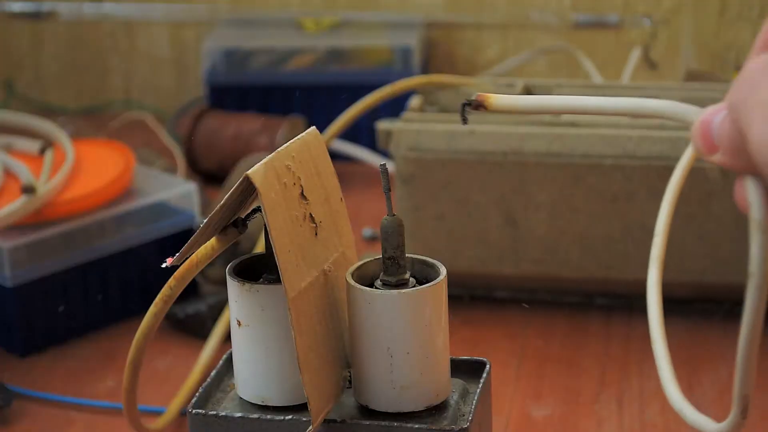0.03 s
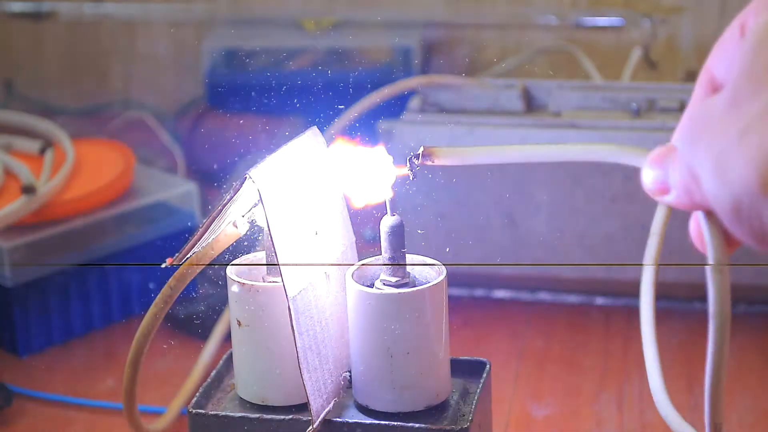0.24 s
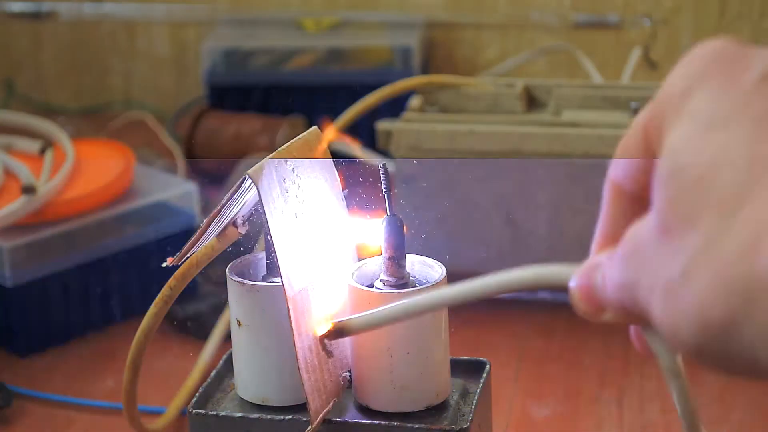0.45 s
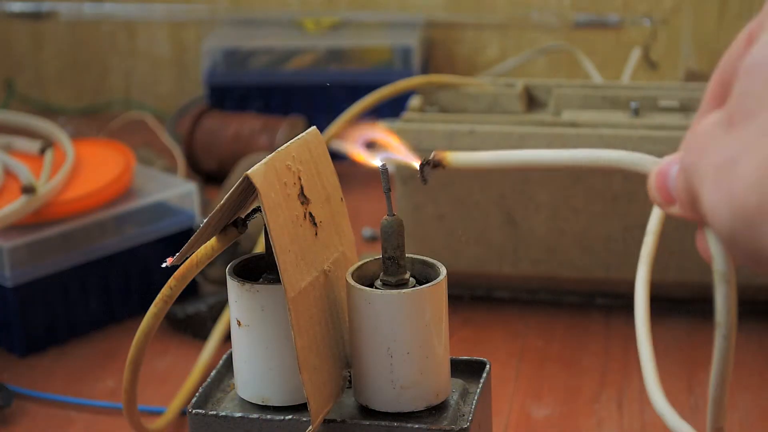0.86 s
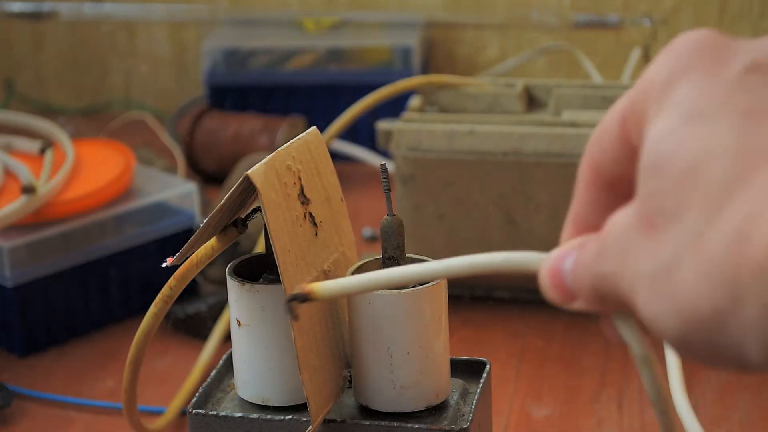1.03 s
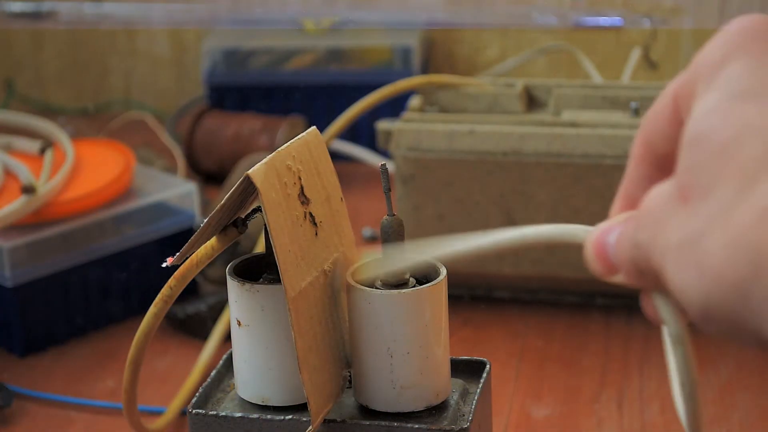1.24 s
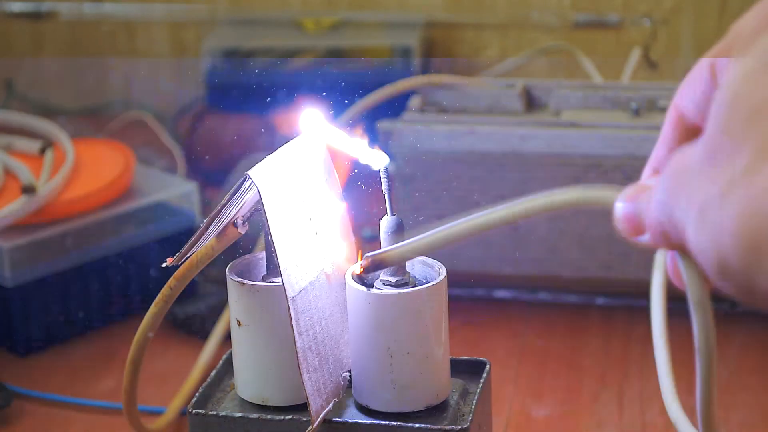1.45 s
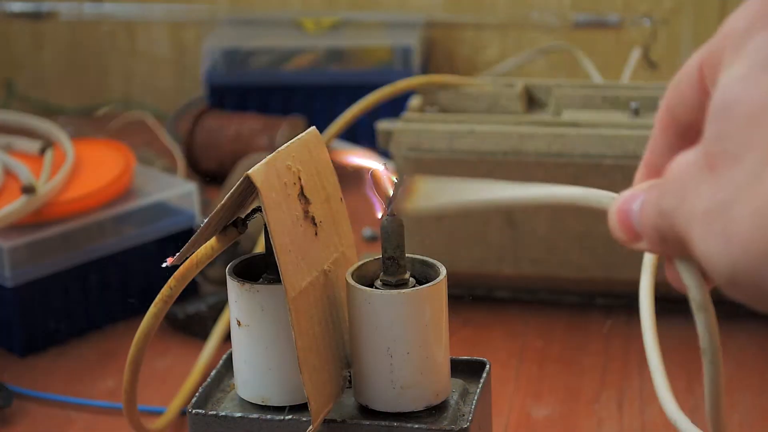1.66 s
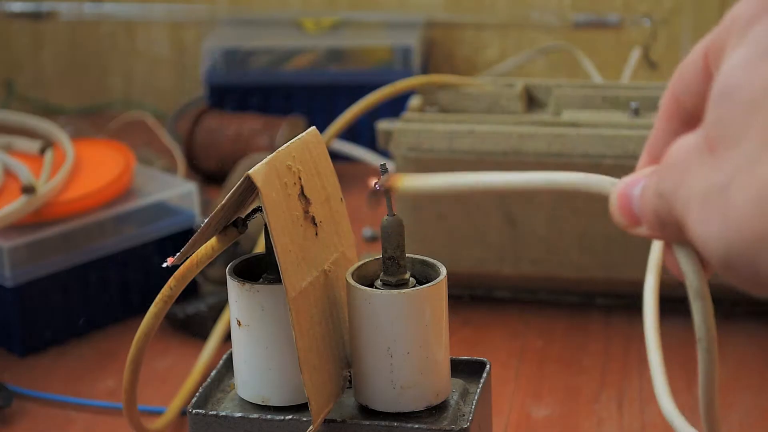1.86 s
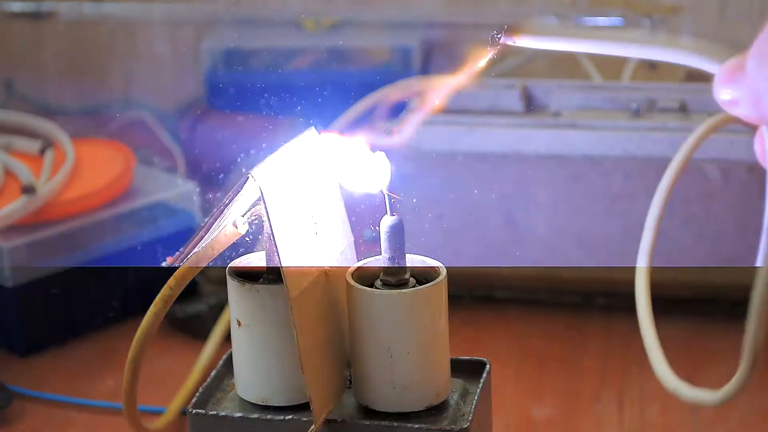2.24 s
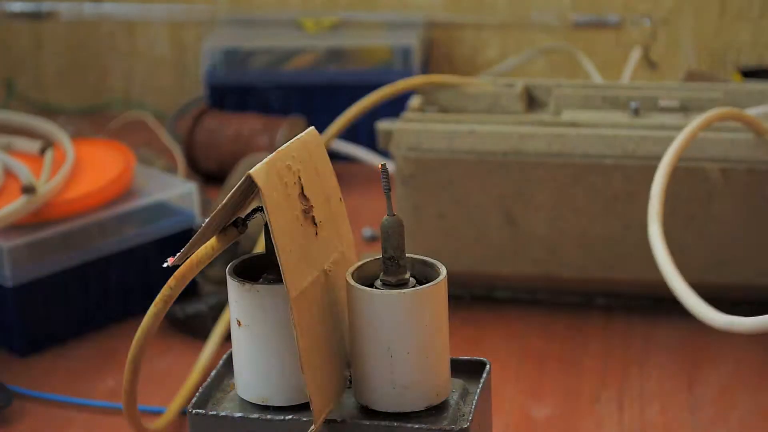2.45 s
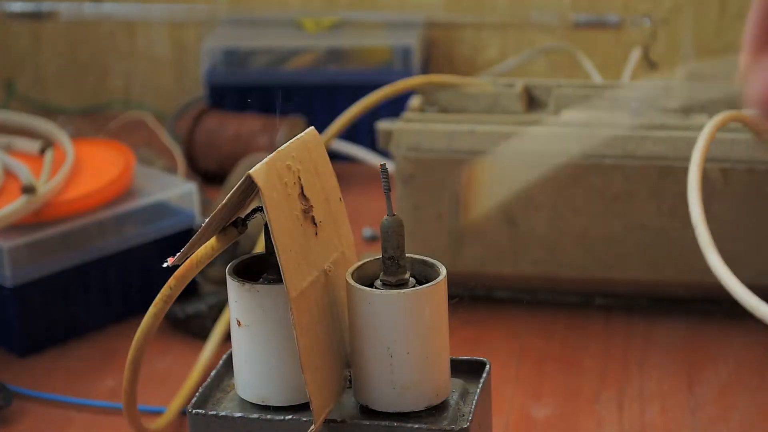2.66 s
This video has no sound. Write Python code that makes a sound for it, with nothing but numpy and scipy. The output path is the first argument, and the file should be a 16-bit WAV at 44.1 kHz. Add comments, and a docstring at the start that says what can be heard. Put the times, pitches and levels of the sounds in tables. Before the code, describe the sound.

High-voltage arcs jump from a wire to terminals on a workbench: one longer buzzing hiss, eight quick zaps, then another longer one. They are loud and distorted at the close microphones, each leaving a brief small-room echo.

```python
"""A workbench in a small room, a camera's two microphones close to a pair of porcelain terminals.
Over faint hum and the last of an echo, tiny sparks snap as a hand-held wire closes the high-voltage gap.
A long arc roars, pulsing with the mains; eight short ones follow, some led by sparks, then a last long one.
Each leaves bench and room ringing. The arcs overload the microphones by far and flatten into a harsh,
even hiss that clears only in the echo."""
import sys
import numpy as np
from scipy import signal
from scipy.fft import rfft, irfft
from scipy.io import wavfile

SR = 44100
rng = np.random.default_rng(int(sys.argv[2]) if len(sys.argv) > 2 else 0)


def waveform_to_disk(signal):
    """Save audio, clipped to [-1, 1], as 16-bit WAV at the path in sys.argv[1]."""
    frames = np.transpose(np.atleast_2d(signal))
    scaled = np.clip(frames, -1, 1) * 32767
    samples = np.round(scaled).astype(np.int16)
    wavfile.write(sys.argv[1], SR, samples)


N = 119070

# arcs across the terminals: start_s, length_s, level_db, fade_db_per_s
ARC_STRIKES = [(.2, 0.34, -5, 17), (0.8385, 0.046, -1, 139), (1.021, 0.026, -7.5, 150),
               (1.19, .035, -0.5, 102), (1.28, 0.05, -12.5, 98), (1.4985, 0.14, -2, 44),
               (1.743, 0.0473, -2.5, 74), (1.82, 0.054, -3, 81), (1.941, 0.065, -2, 45),
               (2.05, 0.34, -5, 18)]
# sparks before contact: start_s, level_db
SPARK_SNAPS = [(.1459, -69), (0.1663, -54), (0.1779, -27.5), (.8179, -29.5), (1.168, -25), (1.442, -37),
               (1.478, -31)]
# colour of the crack at close range: frequency_hz, level_db
CRACK_COLOUR = [(60, -98), (300, -4.5), (800, -11), (2200, -1), (5000, -0.5), (8000, 2), (11500, 0.5),
                (16000, -4.5)]
# things ringing on the bench: pitch_hz, level_db
BENCH_RINGS = [(2517, 1.5), (2631, 4.5), (2661, -6.5), (2760, -12), (3995, 1), (4091, 7.5), (4298, -19),
               (4495, -17), (4614, 6.5), (4711, 3), (4791, -11), (5935, 4)]
# colour of the echo off the walls: frequency_hz, level_db
ECHO_COLOUR = [(60, -21.5), (450, -21.5), (900, -9.5), (1550, -10), (2700, 2), (3250, -4), (4300, 3.5),
               (6000, -0.5), (10000, -2), (16000, -19)]
# reverberation time of the room: frequency_hz, t60_s
ROOM_DECAY = [(200, 0.3), (1400, 0.34), (4000, .36), (9000, 0.29), (15000, 0.26)]
# likeness of the two microphones for sound from the bench: frequency_hz, correlation
NEAR_LIKENESS = [(500, .1), (3200, 0.54), (5000, 0.9), (8500, 0.48), (12000, 0.59), (16000, 0.21)]
# the same for sound from the room: frequency_hz, correlation
ROOM_LIKENESS = [(1500, 1), (4000, 0.87), (7000, 0.63), (11000, 0.56), (16000, .15)]
# steady workshop hum: pitch_hz, level_db
HUM_TONES = [(43.1, -89), (118.4, -86.5)]
# colour of the room's air: frequency_hz, level_db
AIR_COLOUR = [(20, 20), (60, -9), (200, -3), (800, -8), (4000, -10), (16000, -42)]
# colour of the recorder after its overload: frequency_hz, gain_db
RECORDER_COLOUR = [(15, -4), (40, -3.5), (120, -2.5), (300, -1.5), (800, 3), (2000, -0.5), (4500, -2),
                   (7500, -3), (11000, -1.5), (13000, -6), (16000, -5.5)]

ARC_DB, PULSE_HZ, PULSE_DEPTH, QUENCH_S = -1, 100.8, 0.39, 0.0035
SPUTTER_DB, SPUTTER_PER_S = 6, 300
SPARK_DB, SPARK_REBOUND = 13.5, 0.72  # rebound: suction as a share of the push
CRACK_T60_S, SCATTER_T60_S, SCATTER_DB = 0.0072, 0.15, 3
ROOM_DB, ROOM_BUILD_S, RING_T60_S, RING_DB = -4, 0.0094, 0.35, -12.5
BOOM_HZ, BOOM_T60_S, BOOM_DB = 199.6, 1.15, -54.5  # low room mode
OPENING_ECHO_DB, AIR_DB = -70.5, -79
CEILING_DB, OUTPUT_DB, TOP_HZ = -23, -0.5, 15780  # clipping level, then gain and treble cutoff


def arc_strength():
    """Each arc strikes at once, weakens and quenches, sputtering and pulsing twice per mains cycle."""
    t, strength = np.arange(N) / SR, np.zeros(N)
    for start, length, db, fade_db_per_s in ARC_STRIKES:
        age = np.maximum(t - start, 0)
        pulse = 1 + PULSE_DEPTH * np.cos(2 * np.pi * PULSE_HZ * age)
        burn = undb(db - fade_db_per_s * np.minimum(age, length))
        quench = np.exp(-np.maximum(age - length, 0) / QUENCH_S)
        strength += (t >= start) * pulse * burn * quench
    sputter = np.interp(t * SPUTTER_PER_S, np.arange(N), rng.standard_normal(N))
    return undb(ARC_DB + SPUTTER_DB * sputter) * strength


def sparks():
    """Single thin snaps across the closing gap: a push of air and its rebound."""
    snaps = np.zeros(N)
    for start, db in SPARK_SNAPS:
        at = int(start * SR)
        snaps[at:at + 2] += undb(SPARK_DB + db) * np.array([1, -SPARK_REBOUND])
    return snaps


def near_crack():
    """One discharge close to the microphones: the first snap and its scatter off the bench."""
    snap = colour(diffuse(NEAR_LIKENESS) * fade(CRACK_T60_S), CRACK_COLOUR)
    scatter = colour(diffuse(NEAR_LIKENESS) * fade(SCATTER_T60_S), CRACK_COLOUR)
    return unit(snap) + undb(SCATTER_DB) * unit(scatter)


def room_echo(bands=12):
    """From farther off: the walls' echo, top treble dying first, the bench's rings and one low mode."""
    t, hz = np.arange(N) / SR, np.fft.rfftfreq(N, 1 / SR)
    centres = np.linspace(0, np.sqrt(TOP_HZ), bands) ** 2
    spectrum, walls = rfft(diffuse(ROOM_LIKENESS)), 0
    for centre, weights in zip(centres, np.eye(bands)):
        band = irfft(spectrum * np.interp(hz, centres, weights), N)
        walls += band * fade(by_hz(ROOM_DECAY, centre))
    build_up = 1 - np.exp(-t / ROOM_BUILD_S)
    walls = colour(walls * build_up, ECHO_COLOUR)
    rings = tones(BENCH_RINGS) * fade(RING_T60_S)
    boom = np.sin(2 * np.pi * BOOM_HZ * t) * fade(BOOM_T60_S)
    return unit(walls) + undb(RING_DB) * unit(rings) + undb(BOOM_DB) * unit(boom)


def opening_echo(echo):
    """The faint tail of an earlier arc, dying away in the room at the start."""
    tail = np.pad(echo[:, SR // 3:], ((0, 0), (0, SR // 3)))
    return undb(OPENING_ECHO_DB) * tail / np.std(tail[:, :SR // 50])


def room_tone():
    """Faint hum and air of the workshop, all around the microphones."""
    hum = np.sqrt(2) * tones(HUM_TONES)
    air = np.sqrt(N) * unit(colour(diffuse(ROOM_LIKENESS), AIR_COLOUR))
    return hum + undb(AIR_DB) * air


def diffuse(likeness):
    """Noise at two closely spaced microphones, as alike as a frequency_hz, correlation table says."""
    alike = by_hz(likeness, np.fft.rfftfreq(N, 1 / SR))
    spectra = rfft(rng.standard_normal((2, N)))
    mid, side = irfft(spectra * np.sqrt([1 + alike, 1 - alike]), N)
    return np.array([mid + side, mid - side]) / np.sqrt(2)


def tones(table):
    """Steady sines at random phases from a pitch_hz, level_db table."""
    t = np.arange(N) / SR
    return sum(undb(db) * np.sin(2 * np.pi * (hz * t + rng.random())) for hz, db in table)


def colour(x, table, size=4096):
    """Minimum-phase filter that follows a frequency_hz, level_db table."""
    gain = undb(by_hz(table, np.fft.rfftfreq(size, 1 / SR)))
    cepstrum = irfft(np.log(gain))
    cepstrum[1:size // 2] *= 2
    cepstrum[size // 2 + 1:] = 0
    impulse = irfft(np.exp(rfft(cepstrum)))
    return signal.fftconvolve(x, impulse[None], axes=1)[:, :N]


def by_hz(table, hz):
    """Read a table on a log-frequency axis."""
    frequencies, values = np.array(table).T
    return np.interp(np.log(np.maximum(hz, 1)), np.log(frequencies), values)


def fade(t60_s):
    """Exponential decay, 60 dB in the given time."""
    return np.exp(-np.log(1000) * np.arange(N) / SR / t60_s)


def unit(x):
    """Scale to unit energy, averaged over the channels."""
    return x / np.sqrt(np.mean(np.sum(x ** 2, axis=-1)))


def undb(db):
    """Decibels to gain."""
    return 10 ** (np.asarray(db) / 20)


def scene(stretches=3):
    """At the microphones: each stretch of plasma roars along its own paths through bench and room."""
    strength, snaps, heard = arc_strength(), sparks(), 0
    for _ in range(stretches):
        echo = room_echo()
        discharge = strength * rng.standard_normal(N) + snaps
        paths = near_crack() + undb(ROOM_DB) * echo
        heard += signal.fftconvolve(discharge[None], paths, axes=1)[:, :N] / np.sqrt(stretches)
    return heard + opening_echo(echo) + room_tone()


def record(dry, oversample=4):
    """The microphone amplifiers clip hard; the recorder then colours the sound and cuts the top."""
    fine = signal.resample_poly(dry, oversample, 1, axis=1)
    clipped = np.clip(fine, -undb(CEILING_DB), undb(CEILING_DB))
    clipped = signal.resample_poly(clipped, 1, oversample, axis=1)
    coloured = undb(OUTPUT_DB) * colour(clipped, RECORDER_COLOUR)
    lowpass = signal.firwin(401, TOP_HZ, window=("kaiser", 8), fs=SR)
    return signal.fftconvolve(coloured, lowpass[None], mode="same", axes=1)


dry = scene()
out = record(dry)
waveform_to_disk(out)
```